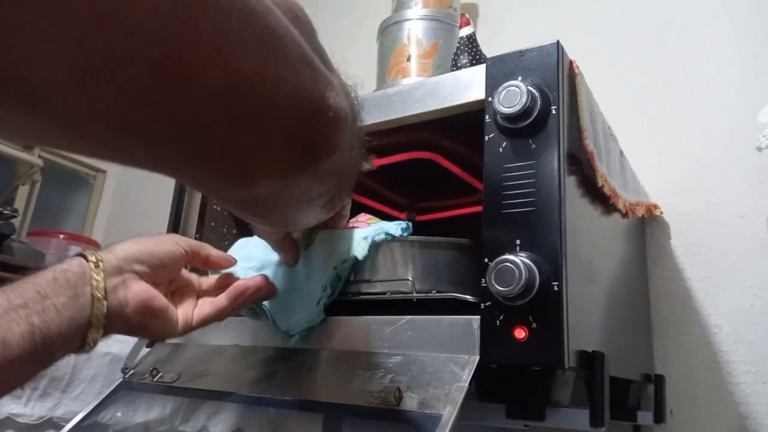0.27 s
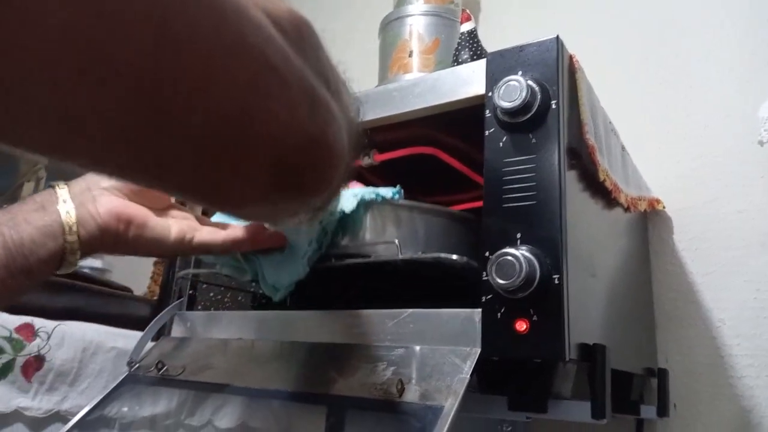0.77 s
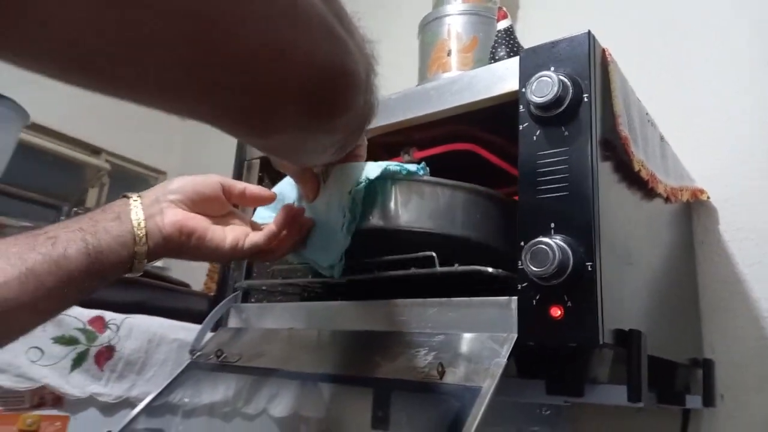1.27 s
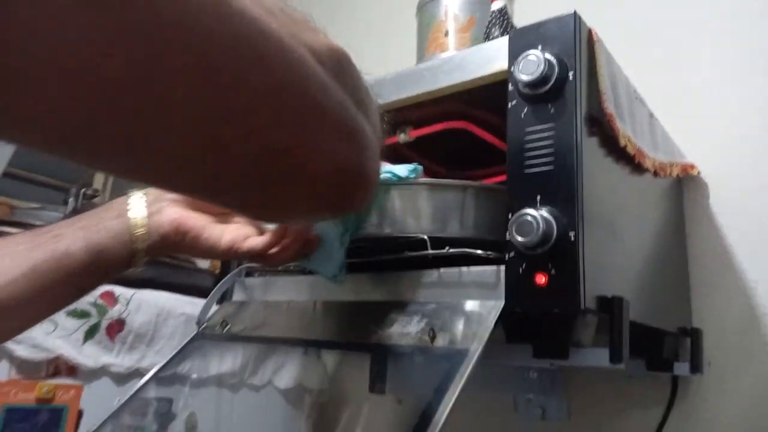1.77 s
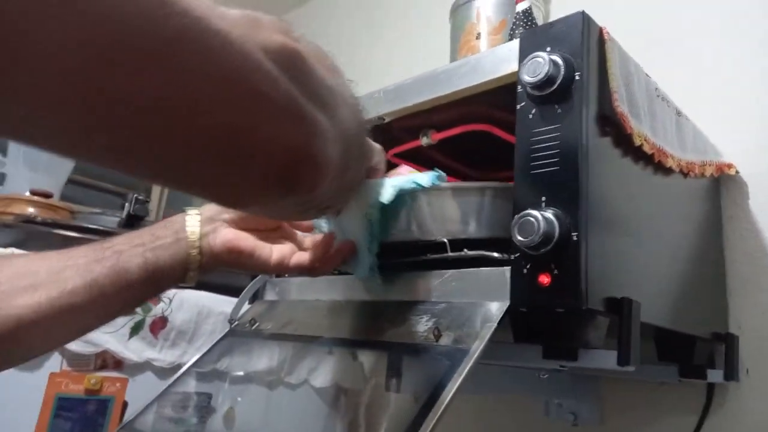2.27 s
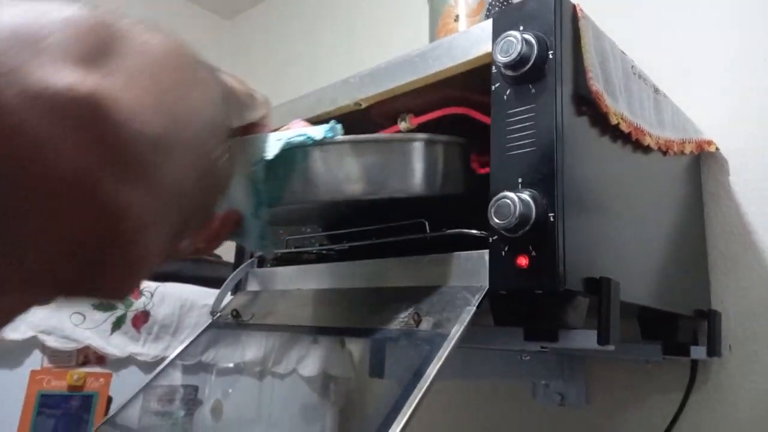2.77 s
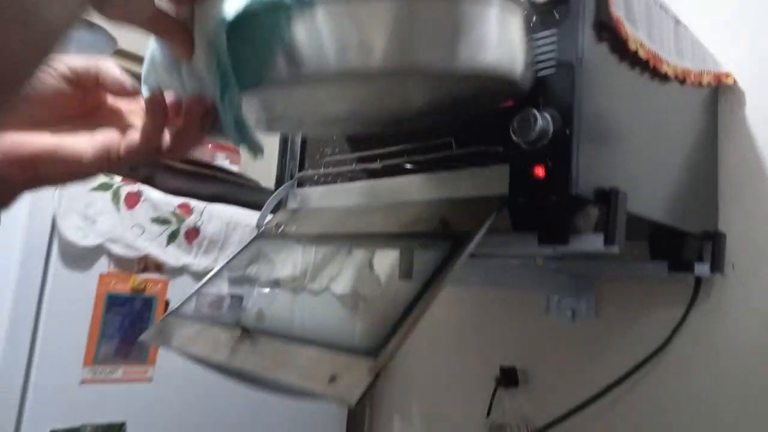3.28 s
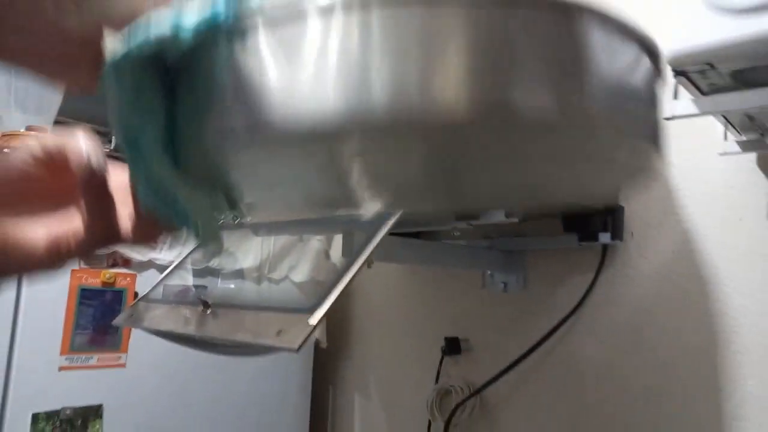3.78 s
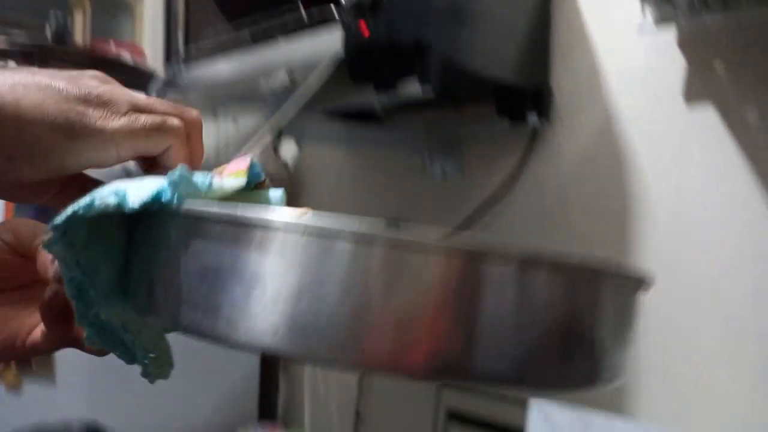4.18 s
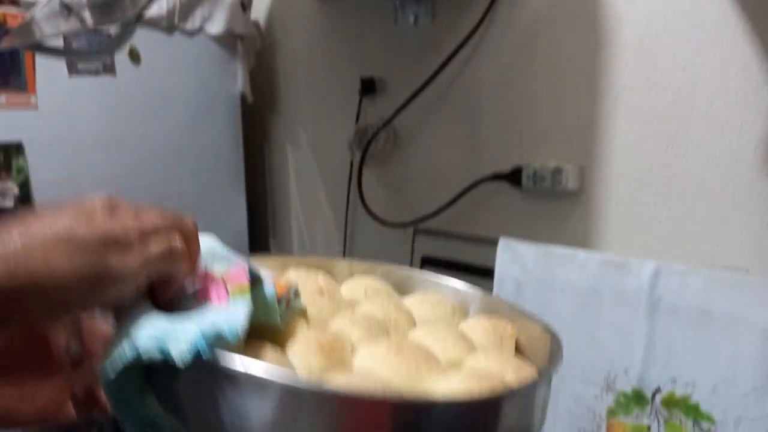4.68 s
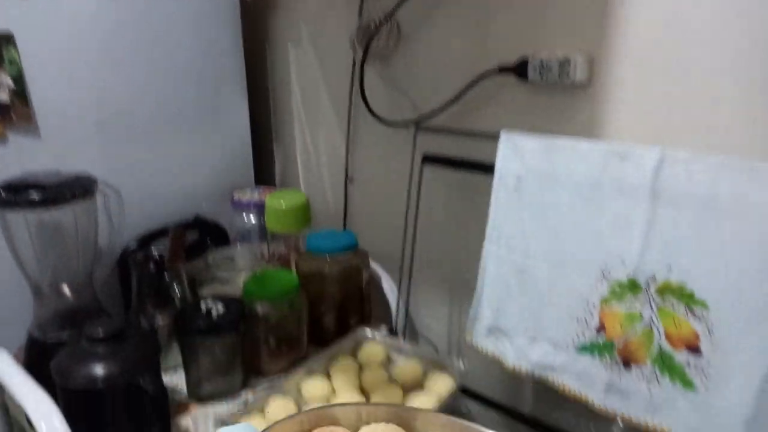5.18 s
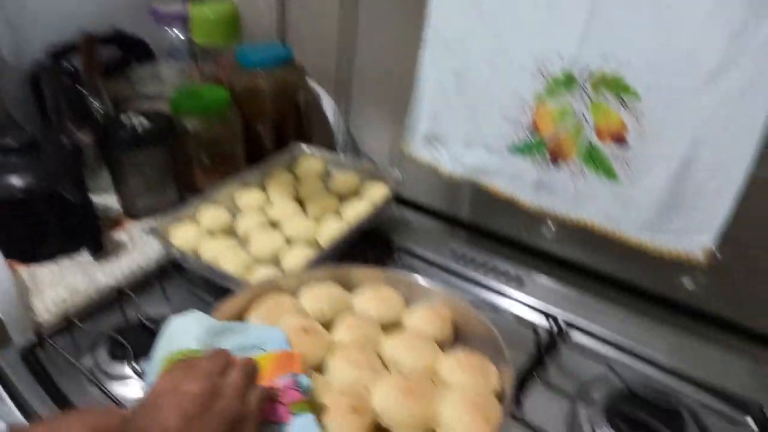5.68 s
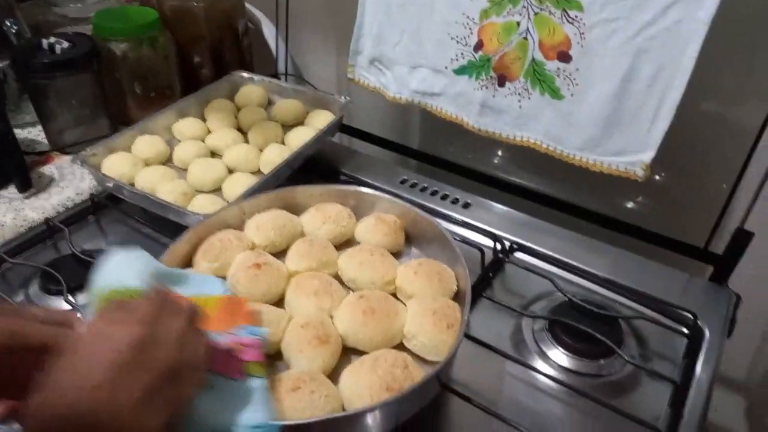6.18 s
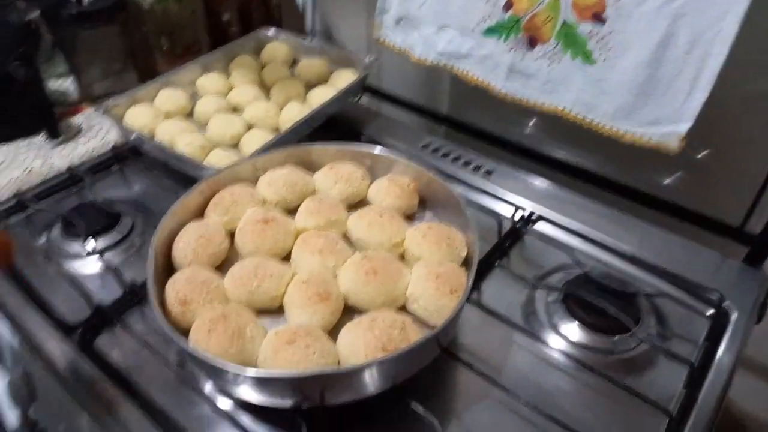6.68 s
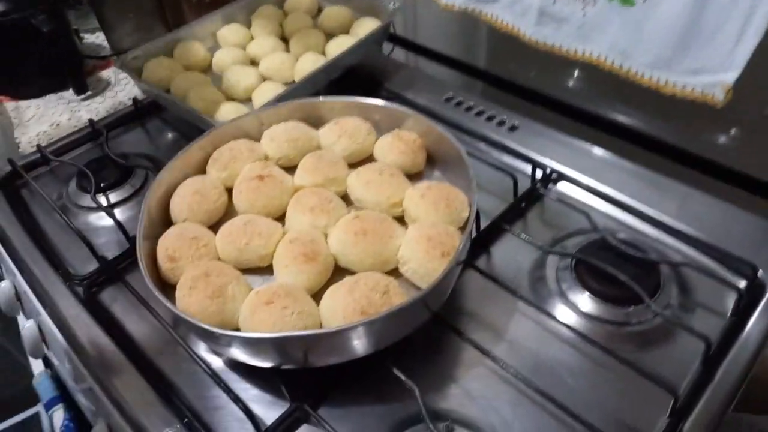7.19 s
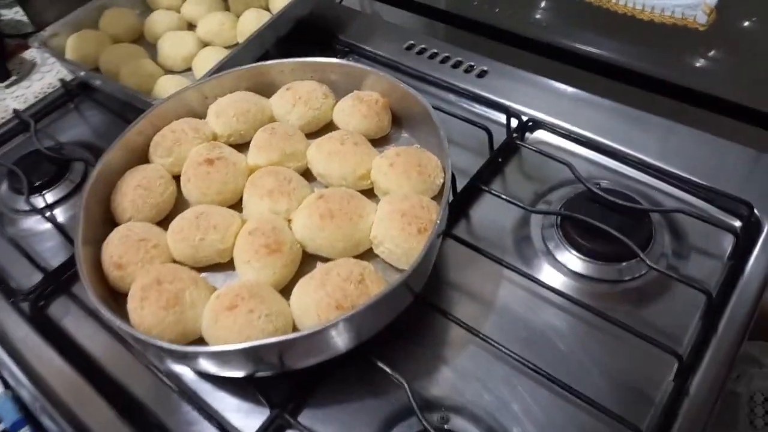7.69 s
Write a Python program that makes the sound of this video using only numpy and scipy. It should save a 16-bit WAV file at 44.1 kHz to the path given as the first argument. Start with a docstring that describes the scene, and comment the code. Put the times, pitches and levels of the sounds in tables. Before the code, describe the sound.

Steel scrapes, squeaks and knocks as a pan is pulled from an oven and set on a stove with clanks and hollow thumps.

```python
"""A round baking pan is dragged over the rack of a small oven: friction on grit drives the sheet metal,
steel squeaks on steel by stick-slip, knocks ring its modes and the hollow oven booms. The pan is lifted
out amid rustles of cloth and steps, and a faint far tone wavers. It is then set down on stove grates,
where it clatters, scrapes and drums, and a grate twice rings thinly. Throughout, a small hard kitchen
hums and reverberates, heard through the two microphone ports of a hand-held camera turning with the pan."""
import sys
import numpy as np
from scipy import signal
from scipy.fft import rfft, irfft, next_fast_len
from scipy.io import wavfile
from scipy.ndimage import uniform_filter1d, map_coordinates

SR = 44100
rng = np.random.default_rng(int(sys.argv[2]) if len(sys.argv) > 2 else 0)


def master_out(mix):
    """Clip the mix to full scale and print it as 16-bit PCM to the path in sys.argv[1]."""
    frames = np.transpose(np.atleast_2d(mix))
    ceiling = np.clip(frames, -1, 1)
    pcm = np.round(ceiling * 32767).astype(np.int16)
    wavfile.write(sys.argv[1], SR, pcm)


N = 350358
LIFTED_S, TOP_HZ = 3.6, 15950  # the pan leaves the oven; upper band limit
SETTLE_S = 0.0403  # the pan's weight lands on the hollow body after the rim touches


def amp(db):
    return 10 ** (np.asarray(db) / 20)


def unit_rms(x):
    return x / np.sqrt(np.mean(x ** 2) + 1e-20)


def over_frequency(points, hz):
    """Interpolation of (frequency, value) points on a logarithmic axis."""
    freqs, values = np.transpose(points)
    return np.interp(np.log(hz + 1), np.log(freqs + 1), values)


def over_time(rows):
    """Linear interpolation of (time, values...) rows at every sample."""
    times, *columns = np.transpose(rows)
    return np.array([np.interp(np.arange(N) / SR, times, column) for column in columns])


def wobble(rate):
    """Smooth random modulation with rate knots a second."""
    return map_coordinates(rng.standard_normal(int(N * rate / SR) + 4), [np.arange(N) * rate / SR])


def minimum_phase(gain):
    """Causal impulse response of unit energy, from the folded cepstrum of a magnitude spectrum."""
    cepstrum = irfft(np.log(gain + 1e-6))
    half = len(cepstrum) // 2
    cepstrum[1:half] *= 2
    cepstrum[half + 1:] = 0
    pulse = irfft(np.exp(rfft(cepstrum)))
    return pulse / np.linalg.norm(pulse)


def band_gains(db, weight_db, sharp_db):
    """Low, middle and high gains of a force: weight offsets the low band, sharpness the high."""
    return amp(np.array([db + weight_db, db, db + sharp_db]))


def stroke(start, rise, hold, db, slowing, weight_db, sharp_db):
    """Friction follows speed: the pan catches, slides evenly, then fades and dulls as it slows."""
    t = np.arange(N) / SR - start
    lost_db = np.minimum(20 * (np.maximum(t - rise - hold, 0) / slowing) ** 2, 120)
    attack = np.clip(t / np.array([[rise + SETTLE_S], [rise], [rise]]), 0, 1)
    return attack * band_gains(db - lost_db, weight_db, sharp_db - 0.076 * lost_db)


# Strokes of the pan over rack, then grates:
# (start [s], rise [s], hold [s], relative force [dB], time to lose 20 dB [s], weight [dB], sharpness [dB])
PAN_STROKES = [(0, 0.0027, 0.032, -41.5, 0.0037, -2, -3.5), (0.411, 0.0059, 0.055, -41, 0.1, -36, 0.5),
               (0.528, .03, 0.23, -46, 0.2, -20.5, -3), (0.967, .003, 0.1, -31, 0.06, -4, -1),
               (1.121, .03, 0.037, -46.5, 0.51, -4.5, -1), (1.264, 0.003, 0.13, -26.5, 0.1925, -7.5, -0.5),
               (1.487, 0.032, 0.39, -38.5, 0.1569, -5, -0.5),
               (2.229, 0.046, 0.14, -45.5, 0.0875, -13, -0.5), (2.365, 0.04, 0.11, -31, 0.1933, -7, 0.5),
               (2.655, .04, 0.039, -44.5, 0.03, -12.5, -6.5), (5.12, 0.0055, .02, -27, 0.005, -5, 4.5),
               (5.163, 0.0047, 0.0049, -27.5, .06, -5, 6.5), (5.537, 0.016, 0.016, -24.5, 0.0731, -1, 2),
               (5.615, 0.014, 0.045, -36.5, 0.09, 7.5, 0), (5.685, 0.029, 0.0087, -29, 0.06, 6.5, -0.5),
               (5.777, 0.035, 0.04, -37, 0.0361, 3, -4), (5.9, 0.025, 0.019, -22, 0.0319, -6, -3.5),
               (5.974, 0.011, 0.054, -39.5, 0.0756, 6, 3), (6.1, 0.013, 0.0065, -30.5, 0.0517, -1, -1.5),
               (6.193, 0.003, 0.029, -28, 0.0956, 4, -3), (6.306, 0.032, 0.024, -42, 0.08, 2, -9.5)]
def sliding(on_rack, grit_db, lumpy_db, trim_db):
    """Sliding friction: uneven grit comes in lumps as the rim catches; the weight drags evenly."""
    grit = rng.standard_normal(N) * amp(grit_db * np.minimum(rng.exponential(size=N), 3))
    lumps = amp(lumpy_db * 2 * np.tanh(0.32 * wobble(45) + 0.8 * wobble(220)))
    grit = unit_rms(grit * lumps)
    force = np.array([rng.standard_normal(N), grit, grit])
    envelope = sum(stroke(*row) for row in PAN_STROKES if (row[0] < LIFTED_S) == on_rack)
    return force * amp(trim_db) * envelope


def resonate(force, modes, spectrum, band=lambda hz: 1):
    """Forced vibration: Lorentzian peaks stand over the dense modal spectrum of a metal part."""
    hz = np.fft.rfftfreq(16384, 1 / SR)
    peaks = sum(amp(2 * db) / (1 + (2 * (hz - centre) / width) ** 2) for centre, width, db in modes)
    gain = amp(over_frequency(spectrum, hz)) * np.sqrt((1 + peaks) * band(hz))
    return signal.oaconvolve(force, minimum_phase(gain))[:N]


def sheet_metal(forces, modes, spectrum, low_hz, high_hz):
    """Superposition: three bands of one force drive the low, middle and high modes."""
    low = lambda hz: 1 / (1 + (hz / low_hz) ** 6)
    high = lambda hz: 1 / (1 + (high_hz / (hz + 1)) ** 6)
    middle = lambda hz: np.abs(1 - low(hz) - high(hz))
    return sum(resonate(force, modes, spectrum, band) for force, band in zip(forces, (low, middle, high)))


# Prominent modes of the oven: (frequency [Hz], bandwidth [Hz], prominence [dB])
OVEN_MODES = [(239.3, 20, 15), (475, 56, 7), (706, 66, 8.5), (887, 34, 11.5), (1125, 22, 9.5),
              (1229, 13, 6), (1564, 65, 5), (2038, 150, 3.5)]
# Its dense ring: (frequency [Hz], relative spectral density [dB])
OVEN_SPECTRUM = [(30, -33.5), (70, -3), (200, -3), (900, 0.5), (2500, 4.5), (5000, 4), (10000, -11),
                 (16000, -27.5)]
def oven(forces):
    """Modal resonance of the oven, driven through its rack."""
    return sheet_metal(forces, OVEN_MODES, OVEN_SPECTRUM, low_hz=347, high_hz=2440)


# Modes of the thin rack wires: (frequency [Hz], bandwidth [Hz], prominence [dB])
WIRE_MODES = [(9800, 57, 5), (11100, 43, 8.5), (13200, 26, 7.5), (14400, 40, 8.5), (14800, 24, 10),
              (15400, 33, 9)]
# Their rasp: (frequency [Hz], relative spectral density [dB])
WIRE_SPECTRUM = [(6000, -37.5), (9000, 0.5), (16000, 10.5)]
def wire_rasp(rim_force):
    """Nonlinear contact: the harder the rim presses, the more strongly it drives the wires."""
    pressure = np.abs(uniform_filter1d(rim_force ** 2, 400)) ** 0.3
    return amp(18) * resonate(rim_force * pressure, WIRE_MODES, WIRE_SPECTRUM)


# Cloth and feet: (centre [s], time to fall 20 dB either side [s], shuffle level [dB], hiss level [dB])
CLOTH_AND_STEPS = [(0, 0.26, -61, -87.5), (.3, 2.1, -87.5, -68.5), (2.17, 0.1, -64, -72),
                   (3.1, 0.2, -68, -89.5), (3.6, -0.33, -88, -71.5), (3.73, 0.06, -70, -91),
                   (3.92, 0.16, -70.5, -88), (4.05, 0.2, -92, -70), (4.35, 0.06, -55.5, -73),
                   (4.6, 2, -82, -69.5), (4.86, 0.03, -67.5, -70), (6.55, 0.1, -61.5, -66),
                   (7.04, 0.28, -85, -66), (7.11, 0.2, -68.5, -93), (7.361, 0.03, -71, -64.5),
                   (7.56, 0.1, -56.5, -67), (7.852, -0.07, -55.5, -63)]
def rustles(still_shuffle_db=-86, still_hiss_db=-87.5):
    """Gaussian envelopes: the gains of dull shuffle and bright hiss swell over a steady floor."""
    centre, fall, shuffle_db, hiss_db = np.transpose(CLOTH_AND_STEPS)[..., None]
    t = np.arange(0, N + 256, 256) / SR
    bell_db = -20 * ((t - centre) / fall) ** 2
    shuffle = amp(shuffle_db + bell_db).sum(axis=0) + amp(still_shuffle_db)
    hiss = amp(hiss_db + bell_db).sum(axis=0) + amp(still_hiss_db)
    return [np.interp(np.arange(N) / SR, t, gain) for gain in (shuffle, hiss)]


# Likeness of diffuse sound at the two ports: (frequency [Hz], coherence [0-1])
PORT_COHERENCE = [(30, .6), (60, .93), (150, .99), (300, .95), (600, .7), (1200, .1), (2000, 0)]
def diffuse(pair):
    """Diffuse-field coherence: two unrelated signals mix to agree only at long wavelengths."""
    size = next_fast_len(pair.shape[1])
    coherence = over_frequency(PORT_COHERENCE, np.fft.rfftfreq(size, 1 / SR))
    angle = np.arccos(np.clip(coherence, -1, 1)) / 2
    mid, side = irfft(rfft(pair, size) * [np.cos(angle), np.sin(angle)], size)[:, :pair.shape[1]]
    return np.array([mid + side, mid - side])


# Kitchen hum, dull shuffle and bright hiss: (frequency [Hz], relative spectral density [dB])
HUM_SPECTRUM = [(20, -37.5), (45, -14), (65, -2), (95, 11.5), (130, -14.5), (300, -74.5)]
SHUFFLE_SPECTRUM = [(100, -38), (170, -5), (400, -1.5), (1200, -10), (2400, -15), (8000, -81)]
HISS_SPECTRUM = [(1000, -33.5), (2500, -2.5), (4000, 7.5), (6500, 4), (9000, -1.5), (16000, -12)]
def background():
    """Spectrally shaped noise: hum, shuffle and hiss, each in soft patches of time and frequency."""
    out, hz = np.zeros((2, N)), np.fft.rfftfreq(1024, 1 / SR)
    shuffle, hiss = rustles()
    layers = [(amp(-70.5), HUM_SPECTRUM, 1.5), (shuffle, SHUFFLE_SPECTRUM, 3.5), (hiss, HISS_SPECTRUM, 2.2)]
    for gain, spectrum, patchy_db in layers:
        noise = signal.stft(rng.standard_normal((2, N)), nperseg=1024)[2]
        patches = uniform_filter1d(rng.standard_normal(noise.shape[1:]), 12, axis=0)
        patches = unit_rms(uniform_filter1d(patches, 5, axis=1))
        colour = amp(over_frequency(spectrum, hz)[:, None] + patchy_db * patches)
        pair = signal.istft(noise * colour, nperseg=1024)[1]
        out += gain * amp(2.5) * unit_rms(diffuse(pair[:, :N]))
    return out


# Steel squeaks, and two thin high rings of the stove grate (the last two rows):
# (time [s], duration [s], pitch [Hz], level [dB], harmonics [count], roughness [ratio, capped at 0.5])
SQUEAKS_AND_RINGS = [(0.139, 0.12, 1546, -55, 0.56, 0.54), (.435, 0.054, 1505, -39.5, 1.5, 0.55),
                     (0.717, 0.1, 1963, -46, 1.1, 0.54), (.97, 0.044, 1510, -33, 1.3, 0.06),
                     (1.036, 0.073, 1543, -28, 1.4, 0.42), (5.123, 0.032, 2051, -25.5, 7.5, 0.6),
                     (5.121, 0.011, 2083, -25, 1, 0.2), (5.17, 0.017, 5420, -24, 0.8, .5),
                     (5.952, 0.053, 5900, -42.5, 1, 0), (6.199, 0.075, 5931, -32.5, 0.52, 0.09)]
def squeaks_and_rings():
    """Stick-slip gives a squeak its short harmonic series; a ringing grate mode gives one thin tone."""
    out, order = np.zeros(N + SR), np.arange(1, 8)[:, None]
    for start, length, pitch_hz, db, harmonics, rough in SQUEAKS_AND_RINGS:
        n = round(length * SR)
        jitter = uniform_filter1d(rng.standard_normal((2, SR // 2)), 150, axis=1)[:, :n]
        drift, flutter = jitter * np.clip(rough, 0, 0.5)
        phase = 2 * np.pi * np.cumsum(pitch_hz * (1 + 0.5 * drift)) / SR
        gains = np.clip(harmonics - order + 1, 0, 1) * (order * pitch_hz < TOP_HZ) * amp(-1.5 * order)
        swell = np.sqrt(np.sin(np.pi * np.linspace(0, 1, n) ** 0.7)) * amp(100 * flutter)
        out[round(start * SR):][:n] += amp(db) * swell * (gains * np.sin(order * phase)).sum(axis=0)
    return out[:N]


# Knocks on the rack, later on stove and counter:
# (time [s], relative force [dB], weight [dB], sharpness [dB], rattle T60 [s])
PAN_KNOCKS = [(0.262, -57.5, -3, 20.5, 0.036), (0.339, -44.5, -5, 10.5, 0.017),
              (0.942, -44.5, -11.5, 8.5, 0.3), (0.968, -30.5, -15, 0, 0.035),
              (1.642, -12.5, -37, 0.5, 0.072), (1.696, -9.5, -21.5, 1, 0.09), (1.773, -16, -19.5, 1, 0.2),
              (1.934, -18.5, -30, 1, 0.093), (2.278, -39.5, -34, 4.5, 0.08), (2.376, -23.5, -22, -0.5, 0.2),
              (2.43, -20.5, -7.5, 0, .06), (3.234, -22.5, -5.5, -1, 0.24), (4.03, -66, -8.5, 20, 0.15),
              (4.288, -55.5, -14.5, 0, 0.26), (4.547, -50.5, -19, 6.5, 0.168), (4.853, -59, 4, 3, 0.089),
              (4.924, -21, -36.5, 5, 0.07), (5, -29, -38, -2, 0.06), (5.069, -26.5, -34.5, 2.5, 0.1),
              (5.348, -33, 2, 7, 0.16), (5.445, -43.5, 1.5, 7, 0.27), (5.537, -16, -3, 4, 0.041),
              (5.568, -14.5, -16.5, -9.5, 0.035), (5.637, -19.5, -5, 4, 0.025),
              (5.85, -26.5, -16.5, 2, 0.11), (5.874, -13.5, -39.5, 2.5, 0.027), (5.9, -11.5, 0.5, -3, 0.08),
              (5.923, -13.5, -44.5, 5, 0.031), (6.099, -9.5, -13, -9.5, 0.016), (6.127, -26, -20, 3, 0.043),
              (6.193, -19.5, -16, -16, 0.27), (6.475, -34, -20, -10, 0.14), (6.69, -52.5, -16, 4, .08),
              (6.719, -39.5, -15, 3.5, 0.13), (6.752, -27, -21.5, -39, 0.025),
              (6.903, -42.5, -18, 5, 0.042), (7.409, -32, -3.5, -4, 0.044)]
def knocks():
    """Impulsive excitation: a sharp blow, a dying rattle of loose parts, then the settling weight."""
    force, t = np.zeros((3, N + SR)), np.arange(SR // 2) / SR
    settling = t / SETTLE_S * np.exp(1 - (t / SETTLE_S) ** 2)
    for start, db, weight_db, sharp_db, t60 in PAN_KNOCKS:
        loose, crack, thud = rng.standard_normal((3, len(t)))
        impact = 0.62 * loose * amp(-60 * t / t60) + 1.73 * crack * amp(-60 * t / 0.0073)
        impact[0] += 8  # the blow itself
        bands = np.array([0.41 * impact + 0.34 * thud * settling, impact, impact])
        force[:, round(start * SR):][:, :len(t)] += band_gains(db - 4, weight_db, sharp_db)[:, None] * bands
    return force[:, :N]


# The bare click of metal on metal: (frequency [Hz], relative spectral density [dB])
CLICK_SPECTRUM = [(5000, -15.5), (8000, 2), (12000, -1.5), (16000, -12.5)]
def clicks(rim_force):
    """Contact transient: each blow radiates broadband treble with no distinct modes."""
    return amp(-13) * resonate(rim_force, [], CLICK_SPECTRUM)


# Drumming of oven or stove: (time [s], twice the rise time [s], frequency [Hz], relative level [dB])
BODY_BOOMS = [(1.46, .13, 237.4, -30.5), (3.24, .085, 238.2, -27), (5.599, .09, 101.5, -28.5),
              (5.7, .14, 95, -31), (5.89, .11, 230.6, -24), (5.961, .14, 95, -27.5),
              (6.183, 0.097, 230.6, -27.5), (6.21, 0.1346, 89.8, -34)]
def booms():
    """Resonance of a hollow body: under the pan's shifting weight one low mode swells, wavers and dies."""
    out, waver = np.zeros(N + SR), wobble(30)
    for start, length, pitch_hz, db in BODY_BOOMS:
        t = np.arange(round(2 * length * SR)) / SR
        span = slice(round(start * SR), round(start * SR) + len(t))
        swell = 2 * t / length * np.exp(1 - (2 * t / length) ** 2 / 2)
        phase = 2 * np.pi * np.cumsum(pitch_hz * (1 + 0.02 * waver[span])) / SR
        out[span] += amp(db - 7 + 2.5 * waver[span]) * swell * np.sin(phase)
    return out[:N]


# A thin far whistle: (time [s], frequency [Hz], level [dB])
WHISTLE_CONTOUR = [(3.8, 1280, -90.5), (3.9, 1320, -80.5), (4.05, 1305, -89.5), (4.14, 1293, -68.5),
                   (4.27, 1282, -69), (4.5, 1231, -91), (4.6, 1218, -74), (4.78, 1190, -73),
                   (4.9, 1150, -113)]
def whistle():
    """Random amplitude and frequency modulation make one faint tone flutter and waver."""
    hz, db = over_time(WHISTLE_CONTOUR)
    envelope = amp(db + 4 * wobble(45))
    phase = 2 * np.pi * np.cumsum(hz * (1 + 0.011 * wobble(90))) / SR
    return envelope * np.sin(phase)


# Prominent modes of the stove: (frequency [Hz], bandwidth [Hz], prominence [dB])
STOVE_MODES = [(92.5, 16, 20.6), (178.6, 11, 7.4), (230.4, 14, 16.2), (400, 15, 12.1), (550, 25, 7.3),
               (745, 105, 4), (1083, 1150, 6.2), (2280, 266, 5)]
# Its dense ring: (frequency [Hz], relative spectral density [dB])
STOVE_SPECTRUM = [(30, -35.5), (70, -10), (300, -2), (1000, -0.5), (2500, -1.5), (5000, 1), (10000, -13.5),
                  (16000, -26)]
def stove(forces):
    """Modal resonance of the stove, driven through its grates."""
    return sheet_metal(forces, STOVE_MODES, STOVE_SPECTRUM, low_hz=375, high_hz=2400)


# Reverberation time of the kitchen: (frequency [Hz], T60 [s])
KITCHEN_T60 = [(100, 0.5), (250, 0.32), (1000, 0.32), (5000, 0.18), (9000, 0.2), (15000, 0.16)]
def kitchen(x):
    """Time-varying reverberation: pan and camera move, so each stretch of sound gets its own tail."""
    hop = SR // 8
    count = N // hop + 2
    stretches = np.lib.stride_tricks.sliding_window_view(np.pad(x, (hop, 2 * hop)), 2 * hop)[::hop][:count]
    hz, t, noise = signal.stft(rng.standard_normal((count, 2, 3 * hop)), SR, nperseg=256)
    decay = amp(-60 * t / over_frequency(KITCHEN_T60, hz)[:, None])
    tails = signal.istft(noise * decay, SR, nperseg=256)[1]
    tails /= np.sqrt(np.mean(np.sum(tails ** 2, axis=2)))
    wet = signal.fftconvolve((stretches * np.sqrt(np.hanning(2 * hop)))[:, None], tails, axes=2)
    out = np.zeros((2, N + 8 * hop))
    for k, stretch in enumerate(wet):
        out[:, k * hop:][:, :stretch.shape[1]] += stretch
    return diffuse(out[:, hop:hop + N])


# Where the camera faces: (time [s], left minus right treble [dB], left lead [samples])
CAMERA_TURN = [(0, -0.5, 5.9), (2.2, 1, 3.1), (3.3, 2, 5.6), (3.7, -0.5, 16), (4.7, -4, 16.3),
               (5.6, 2, 0.27), (6.3, 0, 12.34), (7.94, -4.5, 12)]
def facing(pair, shadow_hz):
    """Path difference and acoustic shadow: one port leads, and the body shades one side's treble."""
    balance_db, lead = over_time(CAMERA_TURN)
    left = map_coordinates(pair[0], [np.arange(N) + lead], mode="nearest")
    pair = np.array([left, pair[1]])
    treble = signal.sosfiltfilt(signal.butter(1, shadow_hz, "high", fs=SR, output="sos"), pair)
    return pair + treble * (amp([balance_db / 2, -balance_db / 2]) - 1)


def scene():
    """Superposition of direct sound, reverberant field and background at the turning ports."""
    blows, in_oven = knocks(), np.arange(N) < LIFTED_S * SR
    rack_drag = sliding(on_rack=True, grit_db=3.5, lumpy_db=3.0, trim_db=1.5)
    grate_drag = sliding(on_rack=False, grit_db=4, lumpy_db=2.5, trim_db=-4.5)
    pan = oven(rack_drag + blows * in_oven) + stove(grate_drag + blows * ~in_oven)
    pan += wire_rasp(rack_drag[2]) + clicks(blows[2])  # driven by the high band alone
    tones = squeaks_and_rings()
    direct = amp(-6.5) * pan + tones + booms()
    # the bass stays near its source
    carried = signal.sosfilt(signal.butter(2, 260, "high", fs=SR, output="sos"), pan)
    reverberant = kitchen(amp(-2.5) * carried + amp(-1) * tones + whistle())
    return facing(direct + reverberant + background(), shadow_hz=700)


# Response of the microphone ports: (frequency [Hz], left gain [dB], right gain [dB])
PORT_RESPONSE = [(100, 3.5, 3), (6230, -2, 2.5), (6690, 4.5, -18), (7557, -12, -27.5), (9450, -5.5, -10),
                 (12500, -5, -6), (16000, -4.5, -43.5)]
def record(dry):
    """Above resonance both ports lose treble, the right one more; nothing passes the band limit."""
    size = next_fast_len(N + SR // 4)
    hz = np.fft.rfftfreq(size, 1 / SR)
    left_db = over_frequency([(f, left) for f, left, _ in PORT_RESPONSE], hz)
    right_db = over_frequency([(f, right) for f, _, right in PORT_RESPONSE], hz)
    capsule_noise = amp(-74) * rng.standard_normal(dry.shape)
    return irfft(rfft(dry + capsule_noise, size) * amp([left_db, right_db]) * (hz < TOP_HZ), size)[:, :N]


dry = scene()
out = record(dry)
master_out(out)
```